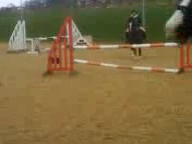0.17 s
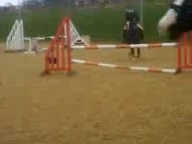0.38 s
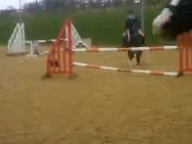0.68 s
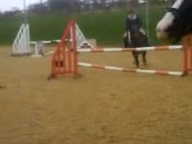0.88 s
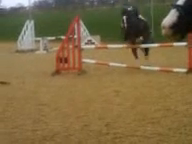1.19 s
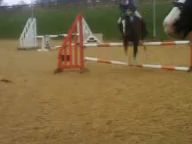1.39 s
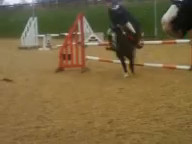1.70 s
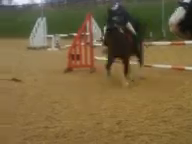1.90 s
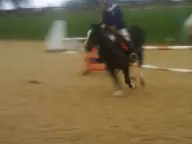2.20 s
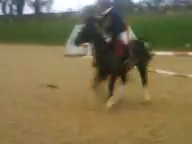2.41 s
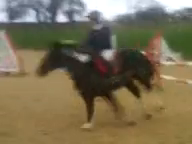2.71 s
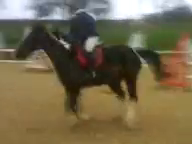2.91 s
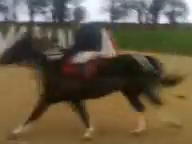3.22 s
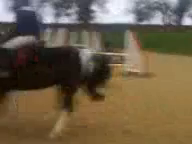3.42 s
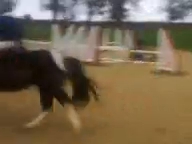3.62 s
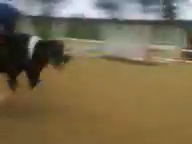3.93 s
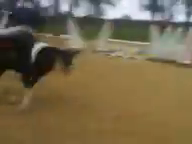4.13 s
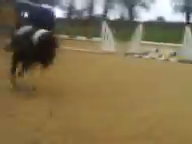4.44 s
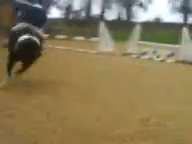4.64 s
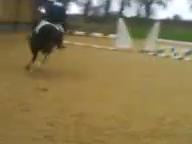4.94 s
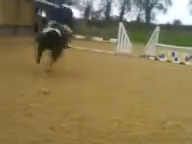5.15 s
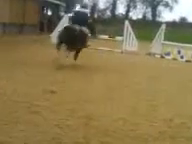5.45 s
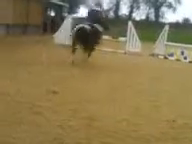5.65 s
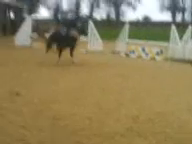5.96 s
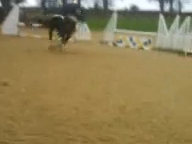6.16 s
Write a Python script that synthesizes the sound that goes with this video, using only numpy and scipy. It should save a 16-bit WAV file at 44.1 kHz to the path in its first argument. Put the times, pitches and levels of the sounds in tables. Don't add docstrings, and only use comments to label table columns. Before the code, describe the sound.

Low wind bumps and faint outdoor hiss open the scene after two quick taps of a buckle. Then separate hoofbeats dig into damp sand, each a short rise, a gritty burst and a long raining hiss. They strengthen, soften, then peak in one overloaded blast before a softer last stride. Gusts keep buffeting the phone's microphone, which passes little treble.

```python
import sys
import numpy as np
from scipy import signal
from scipy.io import wavfile
from scipy.ndimage import uniform_filter1d

SR = 44100
rng = np.random.default_rng(int(sys.argv[2]) if len(sys.argv) > 2 else 0)


def store_wav(level_fs):
    pcm = np.round(np.clip(np.atleast_2d(level_fs), -1, 1) * 32767)
    wavfile.write(sys.argv[1], SR, pcm.T.astype(np.int16))


def magnitude_from_level(level_db):
    exponent = np.asarray(level_db, float) / 20
    return 10 ** exponent


N = 279682

# t/s, spray peak level/dB, burst t60/s, tail level below peak/dB, tail t60/s
STRIDES = [
    (1.377, -14, 0.33, -6, 0.84),
    (2.086, -8, 0.17, -6, 0.87),
    (2.657, -1.5, 0.22, -8, 0.83),
    (3.295, -6.5, 0.28, -11, 1),
    (3.877, -11.5, 0.22, -10.5, 0.92),
    (4.375, -13.5, 0.05, -0.5, 0.73),
    (5.092, -5, 0.053, -10.5, 0.93),
    (5.615, 4.4, 0.2, -11.5, 0.93),
    (6.186, -11.5, 0.3, -4.5, 1),
]
# t/s, peak level/dB, rise/s, t60/s
SCUFFS = [(0.059, -49, 0.0094, 0.38), (1.789, -43, 0.022, 0.083), (1.85, -52, 0.0095, .5),
          (1.941, -54.5, 0.043, 1), (2.062, -49, .012, 1), (3.296, -15, 0.0033, 0.044),
          (3.880, -20.5, .003, 0.054), (3.149, -40, 0.0085, 0.41), (3.303, -11, 0.002, .03),
          (3.322, -10.5, .004, .05), (3.336, -14.5, 0.0022, 0.011), (3.74, -45, 0.017, 0.13),
          (4.33, -41.5, 0.013, 0.27), (4.378, -11, 0.0023, .05), (4.391, -9, 0.0013, 0.0086),
          (4.398, -25, 0.0056, 0.026), (4.44, -21, 0.024, 0.27), (4.658, -33.5, 0.0086, 0.49),
          (4.831, -33.5, 0.0034, 0.41), (4.94, -43.5, .03, 0.94), (5.015, -42.5, 0.0047, 0.38),
          (5.104, -7, 0.003, 0.27), (5.989, -26.5, 0.011, 0.17), (6.197, -10.5, 0.0023, 0.014),
          (6.205, -7.5, 0.0019, 0.025), (6.22, -7.5, 0.0022, .035), (6.188, -12.5, 0.0047, 0.062)]
# delay to peak/s, thud level/dB, t60/s, deep part level/dB, clod level/dB
THUDS = [
    (0.031, -21.5, 0.54, -11.5, 8.5),
    (0.0014, -14, 0.68, -14, 0),
    (0.018, -33, 0.28, 5, 1.5),
    (0.079, -12, 0.25, -9.5, 2),
    (.06, -50, 1, -3, 3.5),
    (0.051, -16.5, 0.82, -7.5, -0.5),
    (0.012, -24, 0.98, -9, -1.4),
    (0.033, -35, 1, -5, -2),
    (.012, -22, 0.35, -8.5, 0.5),
]
# f/Hz, level per Hz/dB
BURST_SPECTRUM = [(35, -57), (60, -42.5), (335, -2), (607, -7), (838, -5), (1180, -5), (1740, 3),
                  (2210, 0.5), (2760, 2), (3270, -1), (3500, -7.5), (4550, -49), (7700, -120)]
# f/Hz, level per Hz/dB
TAIL_SPECTRUM = [(35, -36.5), (60, -9), (92, -8), (150, -14), (268, -7.5), (424, -8.5), (539, -1),
                 (1050, -7), (1200, -1.5), (2330, 0.5), (2710, -1), (3500, -9), (4550, -45), (7700, -120)]
# peak t/s, buffet level/dB, swell over 60 dB/s, fade over 60 dB/s, deep part level/dB
GUSTS = [(.02, -51.5, 0.49, 0.32, 10), (2.065, -30.5, 0.025, .3, -8), (.488, -36, 0.031, 1.6, 1),
         (0.733, -22, .25, 0.47, -11), (.915, -37, .4, 0.77, 0), (.975, -29.5, 0.74, 0.083, -17),
         (1.1, -49.5, 1.5, 0.29, 11), (1.232, -41.5, .25, 0.62, 0.5), (1.744, -35.5, 0.32, 0.38, 3.5),
         (1.807, -25, 0.12, 0.096, -1), (1.9, -48, 0.39, 1, 3), (2.772, -31, .2, 0.14, -13),
         (2.97, -51, 1.2, 0.18, -5.5), (3.5, -31, 0.18, 0.26, -15), (3.641, -38.5, .25, 1.7, 5.5),
         (3.988, -43, 0.28, 0.086, -11), (4.28, -42.5, 0.24, 0.68, 5), (4.7, -23.5, 0.41, 0.59, -12.5),
         (4.83, -31.5, 0.3, 0.56, 0), (4.927, -18.5, 0.099, 0.051, -9), (5.223, -16.5, 0.46, 0.067, -6.5),
         (5.885, -18.5, 0.26, 0.32, -6), (6.15, -42.5, 0.45, 0.45, 4.5), (6.271, -19.5, 0.36, 0.12, -18.5)]
# t/s, peak level/dB, ring f/Hz, crisp edge relative level/dB
LUMPS = [(0.496, -15, 240, -34), (0.556, -12.5, 232, -13), (0.611, -13.5, 328, -31),
         (0.658, -15.5, 422, -11), (0.700, -10.5, 380, -13), (0.722, -16, 361, -1), (.731, -5, 330, -23),
         (0.764, -12, 335, -7), (0.785, -11.5, 380, -1), (0.875, -7.5, 298, -24), (0.923, -14, 360, -26),
         (0.942, -10, 308, -8), (0.975, -11, 193, -37), (1.007, -19, 260, -34), (1.206, -29.5, 223, 0.5),
         (1.236, -21, 158, -28), (1.734, -16.5, 199, -11), (1.800, -12.5, 165, -12), (1.814, -11.5, 228, 2),
         (1.873, -21.5, 148, -20), (3.37, -21.5, 280, -8), (4.421, -10.5, 159, -9), (4.523, -5, 537, -6),
         (4.694, -10, 370, -13), (4.787, -9, 328, -17), (4.812, -11.5, 230, -13), (4.909, -18, 270, 1),
         (4.922, -13, 263, -32), (5.089, -10, 305, -25), (5.903, -7.5, 300, -12)]
# t/s, peak level/dB
TAPS = [
    (0.026, -18.5),
    (0.121, -23),
]
# f/Hz, level in first tap/dB, level in second tap/dB, t60/s
BUCKLE_MODES = [(480, -5, -14, .015), (950, -12, -5, .01), (1270, -7, 0.5, .012), (1850, 4, -3, .012),
                (2250, 2.5, 1.5, .01), (2750, -9, -9, .008), (3250, -10, -1.5, .009)]
# f/Hz, level per Hz/dB
HISS_SPECTRUM = [(29, -39), (50, -30), (102, 0), (183, -5.5), (301, -1), (373, -8), (682, -8), (890, -9),
                 (2200, -5.5), (2500, -8), (3500, -11), (4550, -51), (7700, -120)]

RISE_S, TOE_SHARE = 0.016, 0.1
SCUFF_TAIL_DB = -15.5
CLOD_FADE_DB_PER_S, SPRAY_HZ = 5.5, 2370
CALM_DB = -73.5
EDGE_DB, EDGE_GROWS = -25.5, 0.17
HISS_DB = -62
MIC_LOW_HZ, BAND_TOP_HZ, OVERLOAD = 98, 3348, 0.72


def sand():
    t = np.arange(N) / SR
    burst, tail = np.zeros(N), np.zeros(N)
    falls = [(RISE_S, *stride) for stride in STRIDES]
    falls += [(rise, s, db, t60, SCUFF_TAIL_DB, t60) for s, db, rise, t60 in SCUFFS]
    for rise, s, peak_db, burst_t60, tail_db, tail_t60 in falls:
        heard = slice(round(s * SR), round((s + 1.4) * SR))
        since = np.maximum(t[heard] - s, 0)
        dig = TOE_SHARE + (1 - TOE_SHARE) * np.minimum(since / rise, 1) ** 2.03
        after = np.maximum(since - rise, 0)
        burst[heard] += (dig * magnitude_from_level(peak_db - 60 * after / burst_t60)) ** 2
        tail[heard] += (dig * magnitude_from_level(peak_db + tail_db - 60 * after / tail_t60)) ** 2

    clods_db = np.zeros(N)
    for stride, thud in zip(STRIDES, THUDS):
        later = t >= stride[0]
        clods_db[later] = thud[-1] + CLOD_FADE_DB_PER_S * (t[later] - stride[0])

    def wetness_db(hz):
        clods = clods_db / (1 + (hz / 1300) ** 4)
        fine = 0.58 * np.exp(-(np.log(hz / SPRAY_HZ) / 0.6) ** 2)
        port = 3 * np.exp(-(np.log(hz / 2670) / 0.045) ** 2)
        return clods + fine + port

    thrown = coloured([grains(2500, 0.46), grains(2500, 3.3)], BURST_SPECTRUM,
                      patchy_db=1.5, patch_rate=5.2, shape_db=wetness_db)
    thrown = evened(thrown, span_s=0.021, share=0.38)
    falling = coloured([grains(3000, 0.6), grains(3000, 2.4)], TAIL_SPECTRUM,
                       patchy_db=3.5, patch_rate=7.5, shape_db=wetness_db)
    clumps = magnitude_from_level(3.0 * drift(170))
    falling = evened(clumps * falling, span_s=0.0062, share=0.59)
    return np.sqrt(burst) * thrown + np.sqrt(tail) * falling


def wind():
    deep_gain, dull_gain, bright_gain = buffeting()
    eddies, noise = drift(53), rng.standard_normal((3, N))
    deep = evened(cut(noise[2], [45, 150], "band", order=2), span_s=0.069, share=0.21)
    dull = magnitude_from_level(3.5 * eddies) * cut(noise[0], [150, 480], "band", order=2)
    dull = evened(dull, span_s=0.11, share=1.0)
    edge = cut(noise[1], [380, 820], "band", order=4)
    edge = edge + magnitude_from_level(-41.0) * cut(noise[1], 1200, "high", order=2)
    bright = evened(magnitude_from_level(5.5 * eddies) * edge, span_s=0.05, share=0.99)
    shaking = magnitude_from_level(2.5) * deep_gain * deep + magnitude_from_level(-3.5) * dull_gain * dull + magnitude_from_level(1.0) * bright_gain * bright
    return shaking + wind_lumps()


def buffeting():
    t = np.arange(0, N / SR + 0.002, 0.001)
    calm_db = CALM_DB + np.array([[0], [0], [EDGE_DB]])
    power = np.zeros((3, len(t))) + magnitude_from_level(calm_db) ** 2
    thuds = [(stride[0] + delay, db, 2 * delay, t60, deep_db)
             for stride, (delay, db, t60, deep_db, _) in zip(STRIDES, THUDS)]
    for s, peak_db, swell, fade, deep_db in GUSTS + thuds:
        level_db = peak_db - 60 * np.maximum((s - t) / max(swell, 0.005), (t - s) / max(fade, 0.02))
        bright_db = EDGE_DB + EDGE_GROWS * (peak_db + 22)
        power += magnitude_from_level(level_db + np.array([[deep_db], [0], [bright_db]])) ** 2
    return [np.interp(np.arange(N) / SR, t, np.sqrt(p)) for p in power]


def wind_lumps():
    out = np.zeros(N)
    rough = rng.standard_normal((len(LUMPS), 500))
    for (s, peak_db, hz, crisp_db), noise in zip(LUMPS, rough):
        push, at = np.zeros(1500), round(s * SR)
        push[:50] = np.hanning(50) / 25
        lump = ring(push, hz, 3.84 / hz)
        crisp = np.exp(-np.arange(500) / 130) * cut(noise, [450, 1100], "band", order=4)
        lump[:500] += magnitude_from_level(crisp_db + 9.5) * crisp
        out[at:at + 1500] += magnitude_from_level(peak_db) * cut(lump, 85, "high", order=2)
    return out


def buckle():
    out = np.zeros(N)
    noise = rng.standard_normal((len(TAPS), len(BUCKLE_MODES), 2000))
    contacts = 0.3 * noise * np.exp(-np.arange(2000) / 160)
    contacts[..., 0] = 1
    for k, (s, peak_db) in enumerate(TAPS):
        tap = np.zeros(2000)
        for mode, contact in zip(BUCKLE_MODES, contacts[k]):
            tap += magnitude_from_level(mode[1 + k]) * ring(contact, mode[0], mode[3])
        at = round(s * SR)
        out[at:at + 2000] += magnitude_from_level(peak_db - 13.5) * tap
    return out


def outdoor_hiss():
    hiss = coloured(rng.standard_normal((2, N)), HISS_SPECTRUM, patchy_db=2.2, patch_rate=14)
    return magnitude_from_level(HISS_DB + 1.1 * drift(70)) * hiss


def coloured(source, spectrum, patchy_db, patch_rate, shape_db=lambda hz: 0):
    edges = np.r_[50 * 2 ** np.arange(0, 4.3, 0.25), np.arange(1120, 4600, 170)]
    points = np.array(spectrum[:-2])
    out = 0
    for k, (low, high) in enumerate(zip(edges, edges[1:])):
        hz = np.sqrt(low * high)
        level_db = np.interp(np.log(hz), np.log(points[:, 0]), points[:, 1])
        band = cut(source[k % 2], [low, high], "band", order=2)
        out = out + magnitude_from_level(level_db + shape_db(hz) + patchy_db * drift(patch_rate)) * band
    return rms_one(out)


def grains(per_s, spread_db):
    sizes = magnitude_from_level(spread_db * np.minimum(rng.exponential(1, N), 4)) * rng.choice([-1, 1], N)
    return rms_one(sizes * (rng.random(N) < per_s / SR))


def evened(x, span_s, share):
    power = uniform_filter1d(x ** 2, size=max(round(span_s * SR), 1)) + 1e-9
    return rms_one(x / power ** (share / 2))


def drift(rate):
    r = np.exp(-40 * np.pi * rate / SR)
    noise = rng.standard_normal(N // 20 + 902)
    slow = signal.lfilter([1], [1, -2 * r, r * r], noise)[900:]
    return np.interp(np.arange(N) / 20, np.arange(len(slow)), rms_one(slow))


def ring(clicks, hz, t60):
    r, w = magnitude_from_level(-60 / (t60 * SR)), 2 * np.pi * hz / SR
    return signal.lfilter([0, np.sin(w)], [1, -2 * r * np.cos(w), r * r], clicks + 1e-18)


def cut(x, hz, kind, order):
    return signal.sosfilt(signal.butter(order, hz, kind, fs=SR, output="sos"), x)


def rms_one(x):
    return x / np.sqrt(np.mean(x ** 2) + 1e-20)


def scene():
    return (sand() + wind() + buckle() + outdoor_hiss())[None]


def low_pass(x):
    return signal.sosfilt(signal.butter(12, 16100, fs=SR, output="sos"), x)


def record(dry):
    narrow = cut(dry, MIC_LOW_HZ, "high", order=2)
    narrow = cut(narrow, BAND_TOP_HZ, "low", order=12)
    narrow = signal.sosfilt(signal.ellip(8, 1, 95, 4330, fs=SR, output="sos"), narrow)
    mix = np.clip(narrow, -OVERLOAD, OVERLOAD)
    return low_pass(mix)


dry = scene()
out = record(dry)
store_wav(out)
```